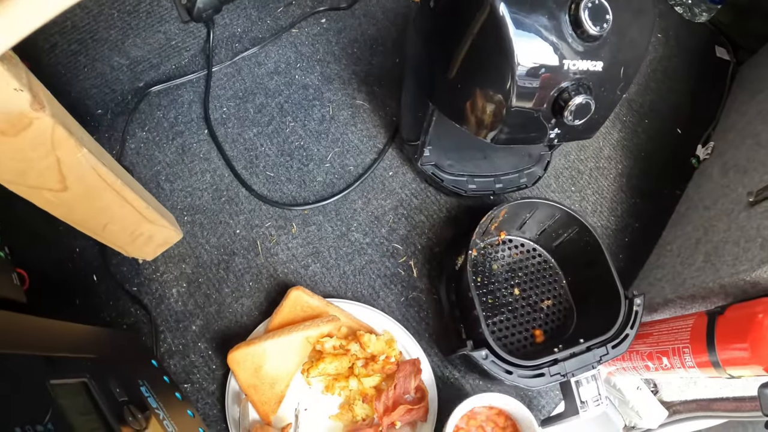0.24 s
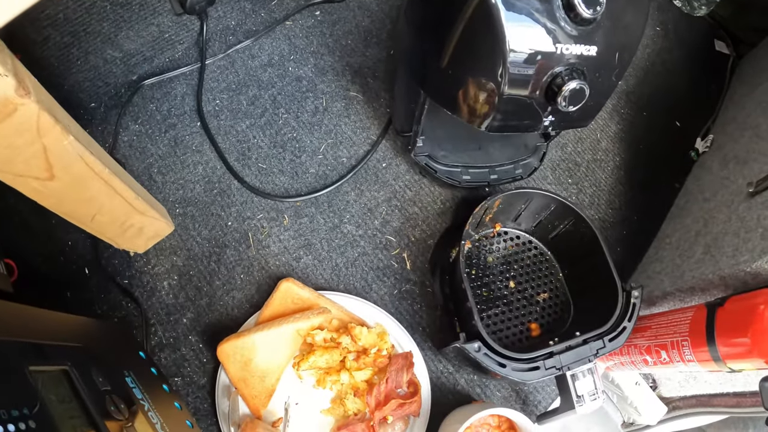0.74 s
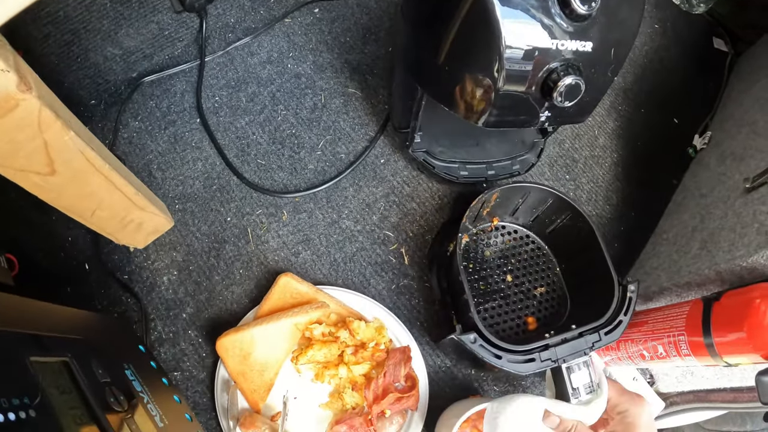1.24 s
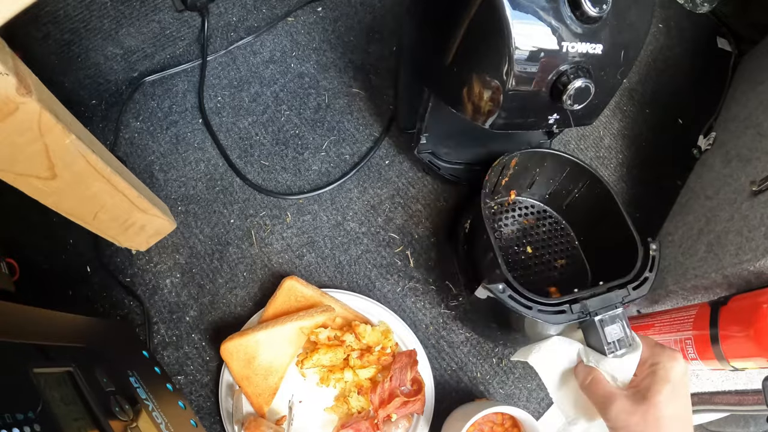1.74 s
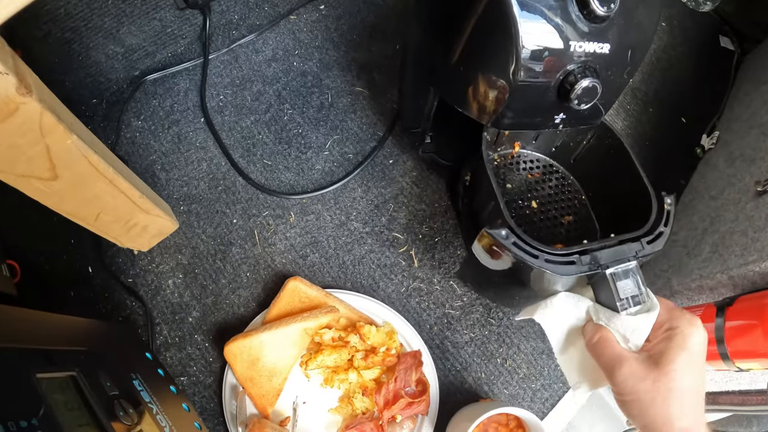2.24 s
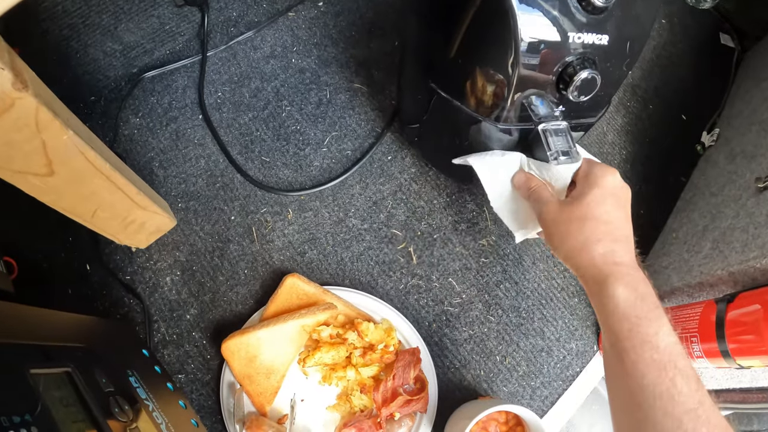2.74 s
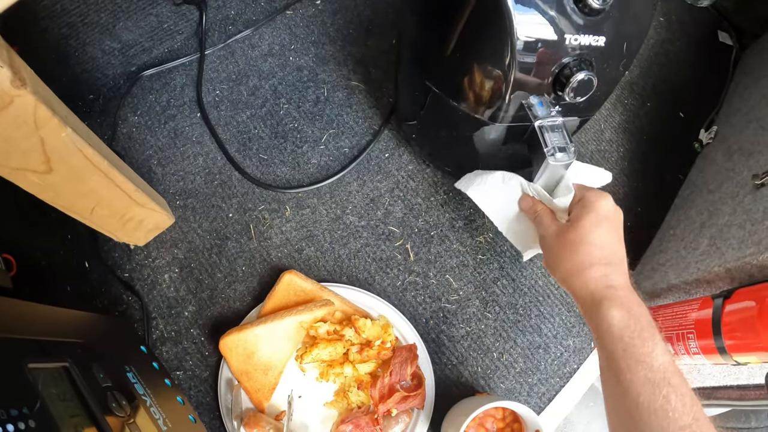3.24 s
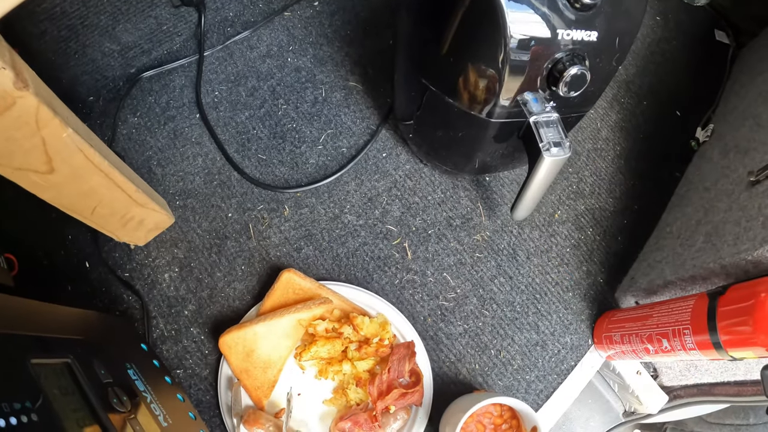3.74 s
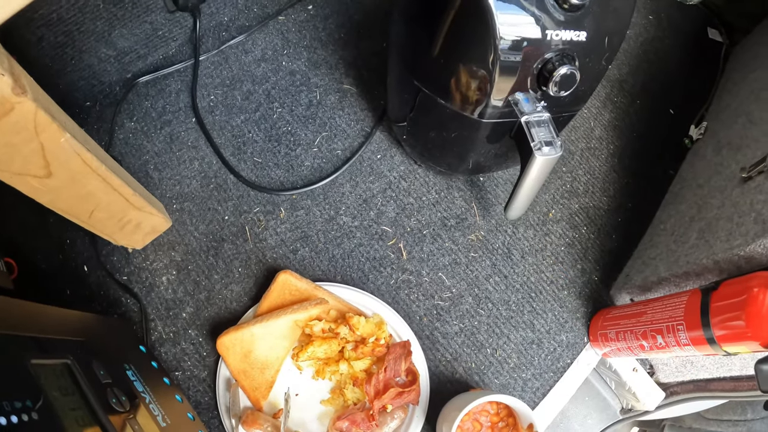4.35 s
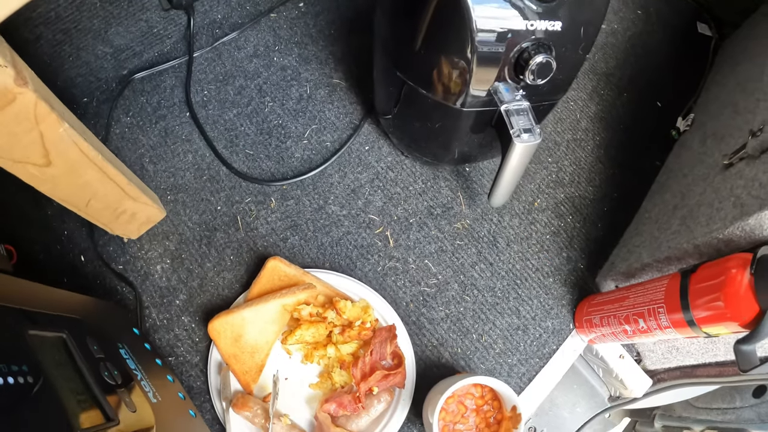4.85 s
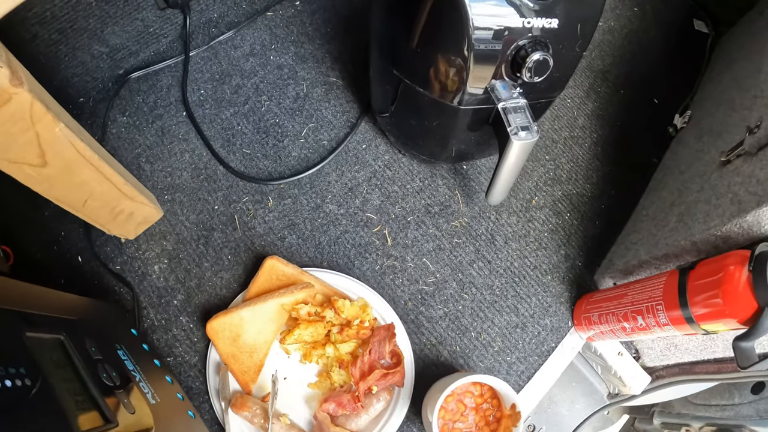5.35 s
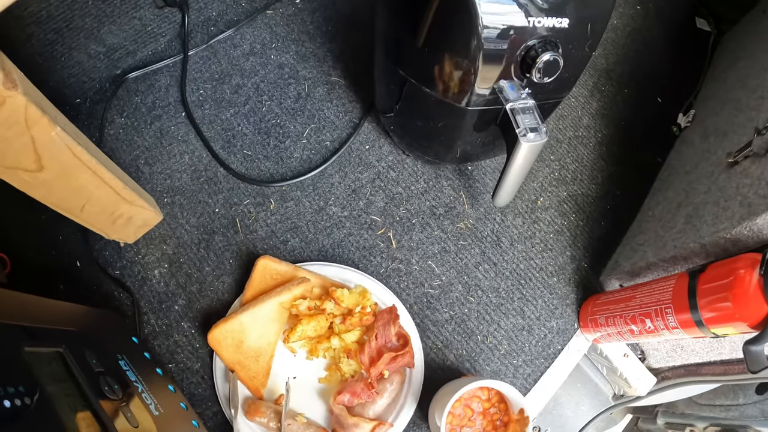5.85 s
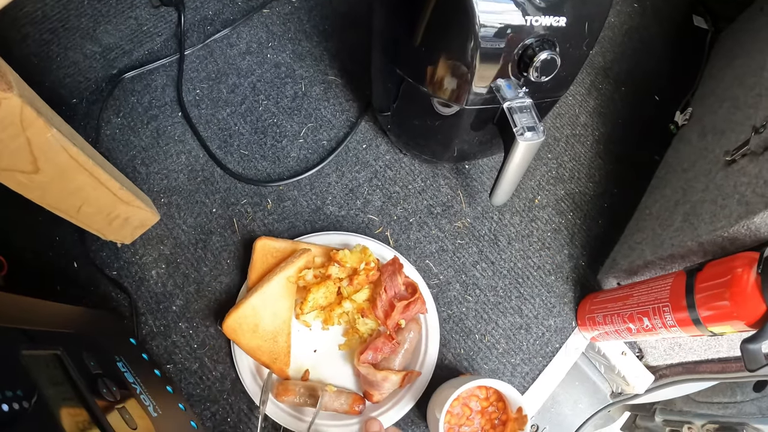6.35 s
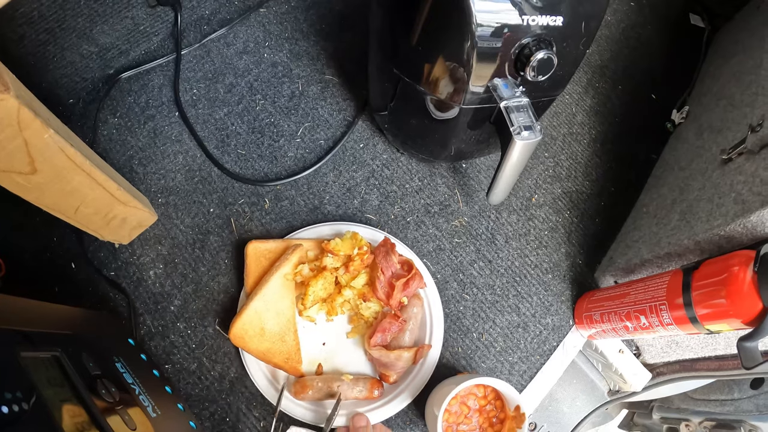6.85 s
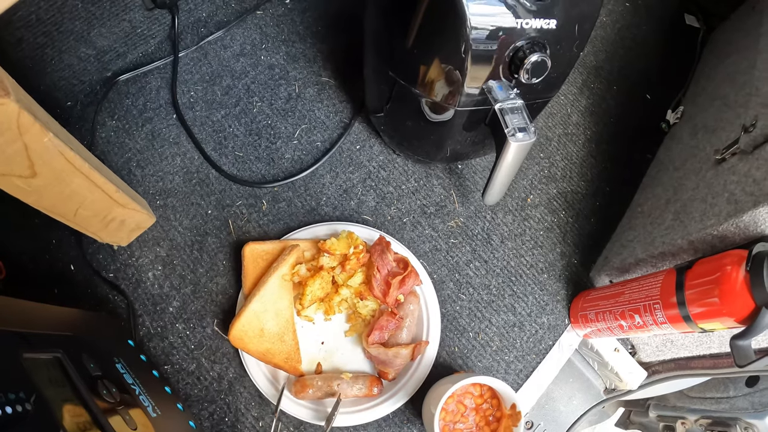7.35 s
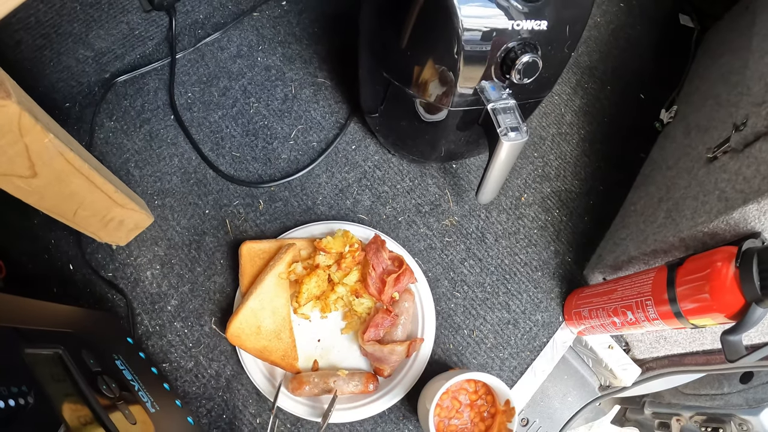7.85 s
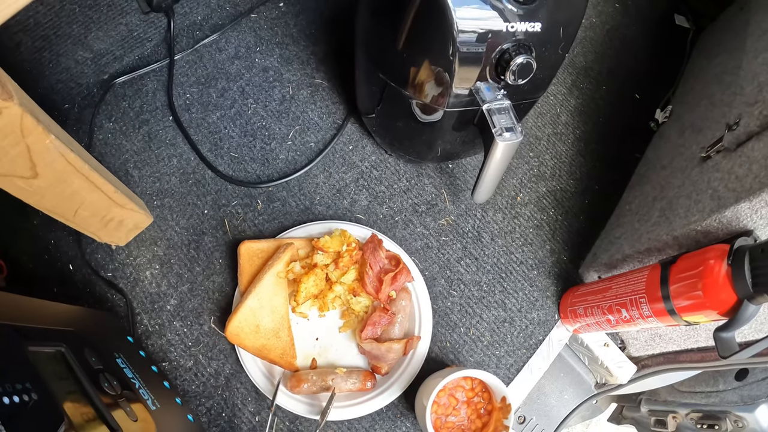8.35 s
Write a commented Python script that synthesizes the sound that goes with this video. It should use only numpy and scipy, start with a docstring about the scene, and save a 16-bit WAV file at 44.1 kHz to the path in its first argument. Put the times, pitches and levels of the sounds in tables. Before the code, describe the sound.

A thin metal fryer drawer is lifted, knocked and scraped into its plastic housing with a hollow clunk, while a jacket rustles close by over low rumble.

```python
"""A jacket rustles close by all the while, over a low rumble that shakes the microphone ports and a low drone.
After an early low thud, a thin metal fryer drawer is lifted off the carpet, knocked, slid into its plastic
housing and shoved home; then the rustling goes on, with creases snapping and a few more low thuds. Noise shaped
by spectra makes cloth, rumble, scraping and collisions; dying sines ring the sheet metal and the thuds."""
import sys
import numpy as np
from scipy import signal
from scipy.fft import rfft, irfft, next_fast_len
from scipy.io import wavfile
from scipy.ndimage import uniform_filter1d, map_coordinates

SR = 44100
rng = np.random.default_rng(int(sys.argv[2]) if len(sys.argv) > 2 else 0)


def voltage_ratio(level):
    """Linear amplitude factor for a level in decibels (scalar or array-like)."""
    return 10 ** (np.asarray(level, float) / 20)


def store_pcm(level_fs):
    """Save levels as 16-bit WAV."""
    pcm = np.round(np.clip(level_fs, -1, 1) * 32767).astype(np.int16)
    wavfile.write(sys.argv[1], SR, np.atleast_2d(pcm).T)


N = 378819

# Modes of the drawer's sheet metal. Each row: pitch in Hz, level in dB, decay time T60 in seconds when free.
SHEET_MODES = [(618, -5, 0.38), (650.5, 8, 0.18), (769, -3, .26), (900, -1, 0.47), (1000, 0, 0.21),
               (1240, -3, .18), (1405, -6, 0.54), (1490, -9, .4), (2050, -7, .2), (2105, -14, .5),
               (2169, -18, 0.56), (2250, -13, .39), (2616, -17, .47), (2736, -7, .4), (2880, -7, .2),
               (3042, -5, 0.47), (3230, -14, .45), (3505, -5, 0.39), (3600, -12, .35), (4040, -12, 0.3),
               (4264, -16, .12), (5125, -14, 0.27), (5580, -17, .2), (5700, -10, 0.2)]


def unit(x):
    """Scales a sound to rms 1."""
    return x / np.sqrt(np.mean(x ** 2) + 1e-20)


def along(points, hz):
    """Reads a curve of (Hz, value) points on a log frequency axis."""
    f, v = np.transpose(points)
    return np.interp(np.log(hz + 1), np.log(f + 1), v)


def curves(rows, t):
    """Gives one value per time for each column after the first."""
    s, *cols = np.transpose(rows)
    return [np.interp(t, s, c) for c in cols]


def during(spans, t):
    """Tells whether each time lies inside one of the spans, and gives their columns as curves."""
    inside = sum((t >= rows[0][0]) & (t <= rows[-1][0]) for rows in spans) > 0
    return inside, curves(np.vstack(spans), t)


def wobble(rate):
    """A smooth random curve with rate knots a second."""
    knots = rng.standard_normal(int(N * rate / SR) + 4)
    return map_coordinates(knots, [np.arange(N) * rate / SR])


def filtered(x, response):
    """Multiplies the spectrum of x by a complex response of frequency."""
    m = next_fast_len(x.shape[-1] + SR // 4)
    spectrum = rfft(x, m) * response(np.fft.rfftfreq(m, 1 / SR))
    return irfft(spectrum, m)[..., :x.shape[-1]]


def resonance(f, hz, width):
    """The response of a causal resonance, its width in Hz."""
    return 1j * f * width / (hz * hz - f * f + 1j * f * width)


def pair(likeness):
    """Left and right noise, as alike at each frequency as the (Hz, likeness) points say."""
    turn = lambda hz: np.arccos(np.clip(along(likeness, hz), -1, 1)) / 2
    mix = lambda hz: np.array([np.cos(turn(hz)), np.sin(turn(hz))])
    mid, side = filtered(rng.standard_normal((2, N)), mix)
    return np.array([mid + side, mid - side])


def add(track, s, sound):
    """Lays a sound into the track at s seconds."""
    part = track[round(s * SR):][:len(sound)]
    part += sound[:len(part)]


def peaked(x, db):
    """Sets the rms of a short sound's loudest 4 ms to a level."""
    return x * voltage_ratio(db) / np.sqrt(uniform_filter1d(x ** 2, size=176).max())


def ringing(t, hz, db, t60):
    """A mode ringing down: a dying sine."""
    return voltage_ratio(db - 60 * t / t60) * np.sin(2 * np.pi * hz * t)


def contact(t, t60):
    """Many tiny collisions dying away: a spiky burst of noise whose level jumps every 40 samples."""
    spikes = voltage_ratio(2.54 * rng.standard_normal(len(t) // 40 + 1)).repeat(40)[:len(t)]
    return voltage_ratio(-60 * t / np.maximum(t60, .003)) * rng.standard_normal(len(t)) * spikes


def rumble():
    """Lumpy shaking of the microphone ports, uneven between them, under a low drone."""
    # Each row: time in seconds, rumble in dB (midway between the ports), drone in dB before its slow lumps.
    low_levels = [(0, -31.5, -49), (.19, -36, -54.5), (.4, -27.5, -42), (.7, -34.5, -53.5),
                  (1.08, -34, -53), (1.24, -40, -49), (1.6, -32.5, -63), (1.98, -37, -43), (2.24, -38, -48),
                  (2.34, -34.5, -34), (2.49, -37, -48), (2.7, -36.5, -26), (3.02, -40.5, -48.5),
                  (3.28, -37, -42.5), (3.59, -42, -49), (4.35, -37.5, -52), (4.7, -33.5, -52),
                  (5.8, -38, -52), (6.2, -41, -53), (7.01, -34.5, -49), (7.2, -35, -50),
                  (8.04, -43.5, -54.5), (8.45, -33.5, -51), (8.59, -41, -52)]
    # Spectrum of the shaken ports. Each row: Hz, relative dB per Hz.
    shake_spectrum = [(8, -11.5), (12, -1), (21, -8), (60, -18.5), (90, -31.5), (200, -77.5)]
    # Spectrum of the low drone. Each row: Hz, relative dB per Hz.
    drone_spectrum = [(40, -30), (70, -0.5), (105, 0.5), (140, -10.5), (210, -13), (260, -16), (400, -28),
                      (800, -70)]
    left_db = -5  # left port over right
    shake_db, drone_db = curves(low_levels, np.arange(N) / SR)
    shake = unit(filtered(pair([(20, 0.96)]), lambda hz: voltage_ratio(along(shake_spectrum, hz))))
    drone = unit(filtered(pair([(100, 1.0), (300, 0.79)]), lambda hz: voltage_ratio(along(drone_spectrum, hz))))
    lumps_db = 1.5 * wobble(6)
    port_db = left_db * np.array([[.5], [-.5]])
    return voltage_ratio(shake_db + port_db) * shake + voltage_ratio(drone_db + lumps_db) * drone


def kitchen(x):
    """The small room's answer: a noise tail in which each frequency dies at its own speed."""
    # Each row: Hz, decay time T60 in seconds.
    decay = [(150, 0.22), (1000, 0.58), (4000, 0.37), (12000, 0.18)]
    hz, t, z = signal.stft(rng.standard_normal((2, SR // 2)), SR, nperseg=256)
    dying = voltage_ratio(-60 * t / along(decay, hz)[:, None])
    thin_lows = (hz[:, None] / (hz[:, None] + 600)) ** 2
    tail = signal.istft(z * dying * thin_lows, SR, nperseg=256)[1]
    late = np.pad(x, (130, 0))[None]  # the answer starts 130 samples (3 ms) late
    return signal.fftconvolve(late, tail / np.linalg.norm(tail[0]), axes=1)[:, :N]


def strokes(t, idle_db):
    """Coarse and fine rubbing strength: every stroke of cloth on cloth swells, holds and fades over the idle rustle."""
    # Each row: start of full strength in seconds, swell, hold and fade in seconds,
    # coarse rubbing in dB, fine rubbing in dB.
    cloth_strokes = [(.01, 0.0067, .005, 0.068, -58.5, -53), (0.442, 0.067, .005, 0.091, -41.5, -45.5),
                     (0.484, .006, 0.018, 0.22, -39.5, -43.5), (0.61, .015, 0.0045, 0.016, -54, -59),
                     (0.67, 0.015, .005, 0.092, -49.5, -50.5), (0.842, 0.019, 0.039, 0.11, -45, -48.5),
                     (1.162, 0.074, .005, .09, -56, -56), (1.259, 0.045, 0.25, 0.1, -42.5, -44.5),
                     (1.603, 0.025, .005, 0.089, -48, -53), (1.707, 0.016, .003, 0.027, -38.5, -62),
                     (2.976, 0.3, .005, 0.12, -54, -60.5), (3.048, 0.054, 0.0052, 0.21, -44.5, -43),
                     (3.153, .03, 0.15, 0.033, -43.5, -49), (3.384, 0.016, 0.025, 0.068, -50, -45),
                     (3.478, .05, 0.063, 0.042, -54, -54), (3.744, 0.026, 0.039, .1, -41, -37),
                     (3.88, 0.046, 0.053, 0.25, -52.5, -54), (4.272, .02, 0.057, .1, -72, -63),
                     (4.444, 0.063, 0.11, 0.091, -45.5, -46), (4.632, 0.056, .005, .08, -42.5, -45.5),
                     (4.794, .25, 0.0065, 0.025, -46.5, -45.5), (4.882, 0.038, .19, 0.085, -45.5, -43.5),
                     (5.2, .04, .005, .06, -60.5, -75), (5.34, 0.067, 0.051, 0.046, -38.5, -36.5),
                     (5.484, 0.0091, .005, 0.048, -49, -55), (5.558, 0.026, .005, 0.29, -47.5, -49.5),
                     (5.894, 0.068, 0.044, 0.083, -35.5, -33.5), (6.032, 0.12, 0.0089, 0.062, -38, -34),
                     (6.119, 0.23, .31, 0.21, -37.5, -38), (6.566, 0.093, 0.042, .03, -41, -43),
                     (6.663, 0.039, 0.017, 0.047, -45, -38), (6.748, 0.12, 0.024, 0.069, -43.5, -51),
                     (6.893, 0.097, .005, 0.23, -36.5, -38), (7.096, 0.079, 0.0083, 0.016, -57, -49),
                     (7.156, 0.023, 0.057, .11, -45.5, -44), (7.433, 0.07, .005, 0.039, -54.5, -53),
                     (7.626, 0.11, .005, 0.087, -59, -53.5), (7.7, 0.036, .005, 0.067, -44, -45.5),
                     (7.83, 0.11, .005, 0.15, -53, -54), (7.982, 0.011, .005, 0.066, -41.5, -44.5),
                     (8.13, .1, .005, 0.13, -40.5, -43), (8.362, 0.17, .005, 0.092, -47, -48.5),
                     (8.46, 0.0049, 0.07, 0.065, -41.5, -44), (8.585, .08, .005, .1, -42, -49)]
    swell_db = 15  # gained over a swell, lost over a fade
    idle_fine_db = -0.5  # fine over coarse rubbing between strokes
    s, swell, hold, fade, coarse_db, fine_db = np.transpose(cloth_strokes)[:, :, None]
    shape_db = -swell_db * np.maximum(np.maximum((s - t) / swell, (t - s - hold) / fade), 0)
    return [np.sqrt(voltage_ratio(idle) ** 2 + np.sum(voltage_ratio(top + shape_db) ** 2, axis=0))
            for idle, top in ((idle_db, coarse_db), (idle_db + idle_fine_db, fine_db))]


def fabric():
    """Rubbing cloth: patchy noise in two resonances that move as the folds shift, with snapping creases."""
    # The jacket between strokes. Each row: time in seconds, idle rustle in dB before it stirs,
    # low mids in dB, fold resonance in Hz, weave resonance in Hz.
    jacket = [(0, -66.5, -63, 1290, 3760), (.33, -66, -72, 1110, 4200), (.52, -72, -51.5, 1170, 3780),
              (.85, -58.5, -55.5, 1400, 3904), (1.17, -58, -72, 1400, 3870), (1.3, -62, -56, 1500, 3720),
              (1.52, -56, -51.5, 1240, 3700), (1.8, -66.5, -59, 1410, 3600), (2.9, -73, -50, 1610, 3750),
              (3.5, -55.5, -60, 1400, 3600), (3.78, -60, -66, 1440, 3340), (4.1, -54, -74, 1640, 3470),
              (4.6, -62.5, -55.5, 1540, 3600), (4.95, -67, -58, 1710, 3930), (5.2, -72, -87, 1650, 3940),
              (5.4, -64, -56, 1720, 3800), (5.72, -79, -68, 1490, 4260), (6.1, -68, -77, 1960, 4360),
              (6.7, -50, -73, 1550, 4150), (6.95, -67, -75, 1700, 4080), (7.3, -64, -85, 1280, 4150),
              (7.65, -56.5, -61, 1516, 4120), (8.05, -55, -53.5, 1520, 4100),
              (8.59, -55.5, -53.5, 1610, 3750)]
    # Creases snapping. Each row: start in seconds, level in dB before the cloth's spectrum, T60 in seconds.
    snaps = [(0.248, -22.5, 0.019), (0.3588, -18.5, 0.043), (0.4915, -25, 0.016), (0.6195, -21.5, 0.013),
             (4.857, -25, 0.015), (5.4744, -42, 0.02), (5.5676, -18.5, 0.058), (5.7954, -16, 0.028),
             (6.8233, -14, 0.015), (7.9757, -24, 0.047), (8.4512, -27, 0.017)]
    # Spectra of the heavy folds, the coarse rubbing and the fine weave. Each row: Hz, relative dB per Hz.
    heavy_spectrum = [(150, -7), (280, -4.5), (500, -11.5), (900, -13), (1500, -34), (3000, -54)]
    coarse_spectrum = [(400, -53), (700, -22.5), (1000, -9), (2200, -8), (3500, -15), (6000, -37.5)]
    fine_spectrum = [(1500, -21.5), (2800, -10.5), (5500, -10.5), (7500, -15.5), (8500, -24.5),
                     (11000, -19), (13500, -28), (15300, -55)]
    # Stereo width. Each row: Hz, left-right likeness from 0 to 1.
    likeness = [(60, .9), (600, .9), (1400, .75), (3100, .65), (7000, .6), (14000, .45)]
    # Stereo balance. Each row: Hz, left over right in dB.
    balance = [(60, -17), (150, 6), (380, -3), (950, 2.5), (2380, -0.5), (5980, 1.5), (15000, 2.0)]
    stir_db, stirs_per_s = 1.5, 22  # the idle rustle comes and goes
    bright_flares = 0.31  # dB of weave whistle per dB that fine rubbing exceeds coarse

    crackle = voltage_ratio(1.4 * wobble(200) + 0.96 * wobble(700))
    hz, t, z = signal.stft(pair(likeness) * crackle, SR, nperseg=256)
    frames = np.minimum(t * SR, N - 1).astype(int)
    idle_db, heavy_db, fold_hz, weave_hz = curves(jacket, t)
    rubbing, fine_rubbing = strokes(t, idle_db + stir_db * wobble(stirs_per_s)[frames])

    def hump(centre, width, top_db):
        """A moving resonance: a bump on the log frequency axis."""
        return voltage_ratio(top_db * np.exp(-(np.log((hz[:, None] + 1) / centre) / width) ** 2))

    def level(g):
        """Evens the power of every frame."""
        return g / np.sqrt(np.mean(g ** 2, 0))

    finer_db = 20 * np.log10(fine_rubbing / rubbing)
    flare_db = 6 + bright_flares * finer_db + 2 * wobble(12)[frames]  # the weave whistles unevenly
    heavy = voltage_ratio(heavy_db) * level(voltage_ratio(along(heavy_spectrum, hz))[:, None])
    coarse = rubbing * level(voltage_ratio(along(coarse_spectrum, hz))[:, None] * hump(fold_hz, .28, 7))
    fine = fine_rubbing * level(voltage_ratio(along(fine_spectrum, hz))[:, None] * hump(weave_hz, .13, flare_db))
    # patches of 4 frequency bins by 8 frames
    grain = rng.standard_normal(z.shape[1:])
    patches = unit(uniform_filter1d(uniform_filter1d(grain, 4, 0), 8, 1))
    gain = voltage_ratio(1.5 * patches) * np.sqrt(heavy ** 2 + coarse ** 2 + fine ** 2)
    sides = voltage_ratio(np.outer([.5, -.5], along(balance, hz)))[:, :, None]
    rub = signal.istft(z * gain * sides, SR, nperseg=256)[1][:, :N]

    creases = np.zeros(N)
    for s, db, t60 in snaps:
        add(creases, s, voltage_ratio(db) * contact(np.arange(SR // 10) / SR, t60))
    cloth = lambda f: voltage_ratio(np.maximum(along(fine_spectrum, f), along(coarse_spectrum, f)))
    return rub + filtered(creases, cloth)


def thuds():
    """Soft low thuds ring a low mode and a shorter one above it, with a dull puff."""
    # Each row: start in seconds, level of the low mode in dB before its rise, its pitch in Hz,
    # its T60 in seconds, rise in seconds, dull puff over the low mode in dB.
    landings = [(0.3575, -5, 96.2, 0.13, 0.0033, -15.5), (1.819, -25.5, 98, 0.45, 0.006, 3.5),
                (1.9, -26, 92, 0.46, 0.0054, 2), (2.178, -10.5, 227, 0.1, 0.0028, -12.5),
                (2.678, -13, 68, 0.17, 0.0062, -7), (3.191, -15.5, 216, 0.33, 0.0018, -5.5),
                (4.35, -34, 477, 0.042, 0.0029, -10), (4.77, -27, 192, 0.081, 0.0055, -22),
                (4.86, -40, 190, 0.07, 0.011, -1), (6.815, -4.5, 20.7, 0.64, 0.077, -28.5)]
    overtone, overtone_db, overtone_t60 = 2.2, -8, .45  # pitch ratio, level and decay ratio over the low mode
    out, t = np.zeros(N), np.arange(SR) / SR
    for s, db, hz, t60, rise, puff_db in landings:
        low = ringing(t, hz, db, t60)
        high = ringing(t, overtone * hz, db + overtone_db, overtone_t60 * t60)
        add(out, s, -(low + high) * (1 - np.exp(-t / rise)))
        puff = unit(filtered(rng.standard_normal(SR), lambda f: resonance(f, 106, 98) ** 2))
        add(out, s, voltage_ratio(db + puff_db - 60 * t / 0.21) * puff * (1 - np.exp(-t / 0.0014)))
    return out


def slide():
    """Dragging shakes the housing with lumpy noise and feeds grit into the sheet metal's modes."""
    # The drawer dragged and settling, in spans. Each row: time in seconds, scrape in dB, grit in dB.
    drags = [
        [(1.8, -49, -56), (1.86, -44, -63), (1.96, -58, -80), (2.16, -62, -72)],
        [(2.17, -31, -43), (2.25, -36, -33), (2.33, -40, -46), (2.39, -35, -35), (2.5, -35, -49),
         (2.55, -42, -36.5), (2.63, -29, -31), (2.71, -28.5, -42.5), (2.76, -34, -31.5), (2.85, -36, -49),
         (2.92, -56, -61)],
        [(3.17, -56, -47), (3.22, -31, -53), (3.3, -40, -48), (3.45, -59, -71)],
    ]
    # Spectra of the rubbed housing and of the grit. Each row: Hz, relative dB per Hz.
    scrape_spectrum = [(90, -3), (200, 5.5), (340, -1.5), (650, -9.5), (1000, -5.5), (1500, -25),
                       (3000, -40.5)]
    grit_spectrum = [(800, 7), (1500, 8.5), (2500, -2), (4500, -1), (7500, -12.5), (11000, -20),
                     (15000, -34)]
    inside, (scrape_db, grit_db) = during(drags, np.arange(N) / SR)

    def modes(f):
        """All sheet modes with alternating signs, wider where they die faster."""
        return sum((-1) ** k * voltage_ratio(level) * resonance(f, hz, 4 / t60)
                   for k, (hz, level, t60) in enumerate(SHEET_MODES))

    lumps = voltage_ratio(2.5 * wobble(120))
    scrape = unit(filtered(lumps * rng.standard_normal(N), lambda hz: voltage_ratio(along(scrape_spectrum, hz))))
    grains = lumps * rng.standard_normal(N)
    grit = unit(filtered(grains, lambda hz: voltage_ratio(along(grit_spectrum, hz))))
    ring = unit(filtered(grains, modes))
    fade = uniform_filter1d(inside * 1., size=400)  # soft edges, 9 ms
    return fade * (voltage_ratio(scrape_db) * scrape + voltage_ratio(grit_db) * (grit + 0.5 * ring))


def drawer():
    """Each knock clacks, rattles, booms in the hollow housing and rings the sheet metal, longest where it hangs free."""
    # Each row: start in seconds, strength in dB, hardness and boom in dB over the strength, clack pitch in Hz.
    knocks = [(1.711, -32, -4, -28, 1370), (1.814, -13, -4, -4.5, 1260), (1.826, -25, -15, 4, 725),
              (1.897, -22, -0.5, 0.5, 794), (1.917, -39, -21, 12.5, 1330), (1.953, -33.5, -5.5, -2.5, 660),
              (2.08, -40.5, -3, 7, 600), (2.175, -11.5, -16, -0.5, 630), (2.218, -19.5, -2, -8, 620),
              (2.228, -20, 1, -15, 646), (2.239, -14, -2.5, -17, 940), (2.295, -29, -21, -20, 999),
              (2.349, -16, -0.5, -1.5, 630), (2.364, -23, 3, -13, 549), (2.457, -12, -12, -12.5, 1010),
              (2.476, -26, -26, -6, 1010), (2.556, -31, -11, 1, 665), (2.58, -20.5, 4.5, -3.5, 584),
              (2.599, -15, 3, -3.5, 676), (2.614, -20.5, 0, -6, 636), (2.633, -14.5, 1.5, -8, 940),
              (2.646, -18, 2, -13, 560), (2.674, -9, -6, -7, 1310), (2.758, -15.5, -18, -7, 1030),
              (2.8, -15, -2, 0, 1210), (2.811, -15, -6.5, 1, 604), (2.876, -33, -27, -4, 696),
              (2.948, -41, -17, -4, 570), (3.033, -31, -1, -14.5, 762), (3.175, -14, -7, -20, 1220),
              (3.183, -10, -6, -6.5, 657), (3.19, -8.5, -25, -3.5, 680), (3.209, -29, -27, 13.5, 1330),
              (3.245, -24, -20, 1.5, 770), (3.275, -26.5, -15, -5, 1210), (3.357, -30, -30, -12, 710),
              (3.445, -39.5, -21, -5, 1450)]
    # Plastic and rim meeting. Each row: Hz, dB per Hz.
    clack_spectrum = [(300, -39), (500, 2), (900, 3.5), (1500, 1), (2300, -2), (3500, -47)]
    # Bare contact noise. Each row: Hz, dB per Hz.
    crack_spectrum = [(1500, -6), (2500, -5.5), (4000, -4), (6000, -9), (8000, -15.5), (11000, -15),
                      (15000, -32)]
    # The drawer hangs free of floor and housing: from and to, in seconds.
    free_from, free_to = (2.1, 2.55)
    clack_db, crack_db = -4.5, -6  # clack over the strength; crack over strength and hardness
    rattle_t60, first_touch = 0.079, 1.33  # seconds; the first collision over the rattle after it
    open_hz, shut_hz, shut_s = 336, 180, 3.1  # the hollow booms lower once the drawer closes it
    shaded_db, shade_hz = -12.5, 6450  # once inside, the housing shades the highest treble
    free_ring_db, held_ring_db = -21, -21.5  # ring over strength
    held_t60 = 0.23  # carpet or housing shortens the ring to this share
    ring_scatter_db, flex = 4, .0015  # each blow finds other modes and bends the sheet a little (share of pitch)
    soft_dulls = 0.17  # dB lost per octave above 1 kHz and per dB of softness, in the ring

    out, t = np.zeros(N), np.arange(SR // 2) / SR
    short = t[:SR // 5]
    sharp = 1 + first_touch * np.exp(-short / 0.0015)
    for s, db, hard_db, boom_db, clack_hz in knocks:
        blow = sharp * contact(short, rattle_t60)
        clack = filtered(blow, lambda hz: voltage_ratio(along(clack_spectrum, hz))
                         + 2.15 * resonance(hz, clack_hz, 0.27 * clack_hz) ** 2)

        shade = lambda hz: voltage_ratio(shaded_db * (s > free_to) / (1 + (shade_hz / (hz + 1)) ** 4))
        bright_hz = rng.uniform(3430, 6040)
        bare = sharp * contact(short, 0.97 * rattle_t60)
        crack = filtered(bare, lambda hz: shade(hz) * (voltage_ratio(along(crack_spectrum, hz))
                                                       + 0.42 * resonance(hz, bright_hz, 690)))

        boom_hz = shut_hz if s > shut_s else open_hz
        push = 0.92 * blow / np.linalg.norm(blow)
        push[0] += 1  # a single impulse leads the rattle
        boom = filtered(push, lambda hz: resonance(hz, boom_hz, 190) * resonance(hz, boom_hz, 59)
                        + 0.19 * resonance(hz, 114, 62) ** 2)
        add(out, s, peaked(clack, db + clack_db) + peaked(crack, db + hard_db + crack_db)
            + peaked(boom, db + boom_db))

        free = free_from < s < free_to
        ring_db, held = (free_ring_db, 1) if free else (held_ring_db, held_t60)
        sheet = np.zeros(len(t))
        for hz, level, t60 in SHEET_MODES:
            dull_db = soft_dulls * min(hard_db, 0) * max(np.log2(hz / 1000), 0)
            bent_hz = hz * rng.normal(1, flex)
            mode_db = level + dull_db + rng.normal(0, ring_scatter_db)
            sheet += ringing(t, bent_hz, mode_db, held * t60) * rng.choice([-1, 1])
        add(out, s, voltage_ratio(db + ring_db) * sheet * (1 - np.exp(-t / 0.00054)))
    return out


def scene():
    """Sums the drawer with its room, the thuds, the jacket and the rumble."""
    # Stereo balance of the drawer. Each row: Hz, left over right in dB.
    drawer_balance = [(300, -1), (1000, 1.2), (2500, -1), (5000, -0.5), (12000, 3)]
    metal = drawer() + slide()
    sides = filtered(metal, lambda hz: voltage_ratio(np.outer([.5, -.5], along(drawer_balance, hz))))
    return sides + voltage_ratio(-17.5) * kitchen(metal) + thuds() + fabric() + rumble()


def band_limit(x):
    """A steep low-pass at the top of the band."""
    return signal.sosfilt(signal.butter(12, 15630, fs=SR, output="sos"), x)


def record(dry):
    """The two microphone ports sit apart in the case, so their phases differ; the treble rolls off."""
    # Response of the microphones. Each row: Hz, gain in dB.
    mic_response = [(20, 1.5), (9000, -1), (12000, -4), (14000, -6), (15000, -24), (15600, -37)]
    # Phase from port to port. Each row: Hz, radians by which the left leads.
    port_lead = [(30, 0.053), (600, -0.2), (1400, -0.51), (2500, -1.52), (3300, -0.92), (4500, -0.7),
                 (8000, -0.59)]
    phase = lambda hz: np.exp(.5j * np.outer([1, -1], along(port_lead, hz)))
    ports = filtered(dry, lambda hz: voltage_ratio(along(mic_response, hz)) * phase(hz))
    return band_limit(ports)


dry = scene()
out = record(dry)
store_pcm(out)
```